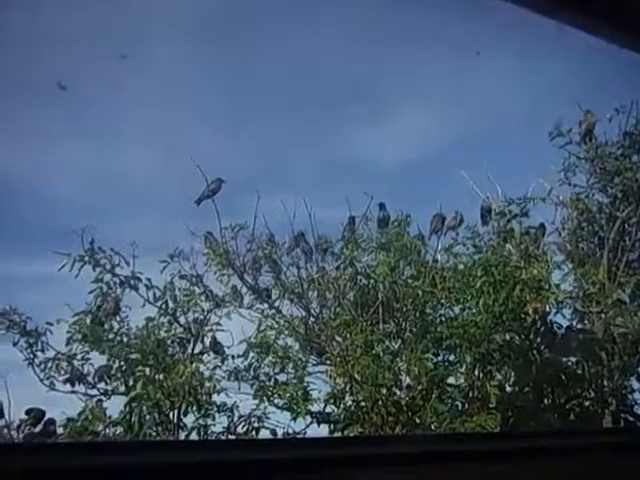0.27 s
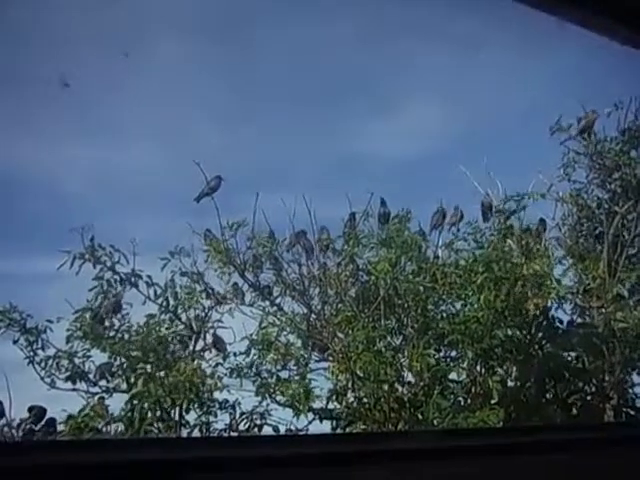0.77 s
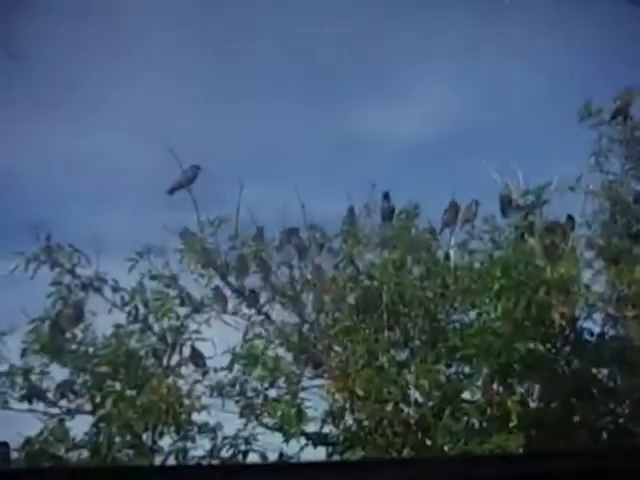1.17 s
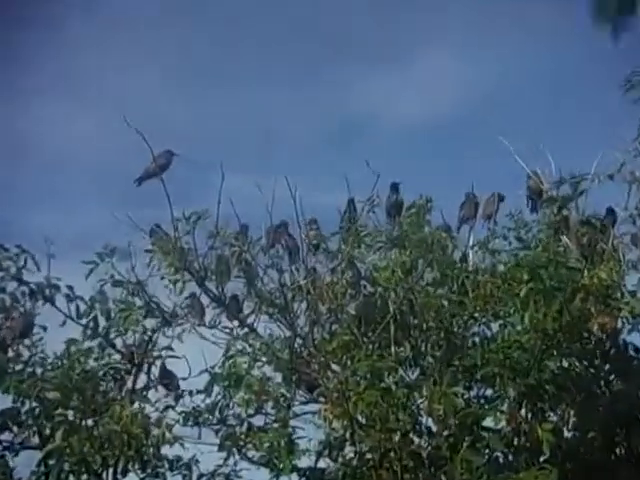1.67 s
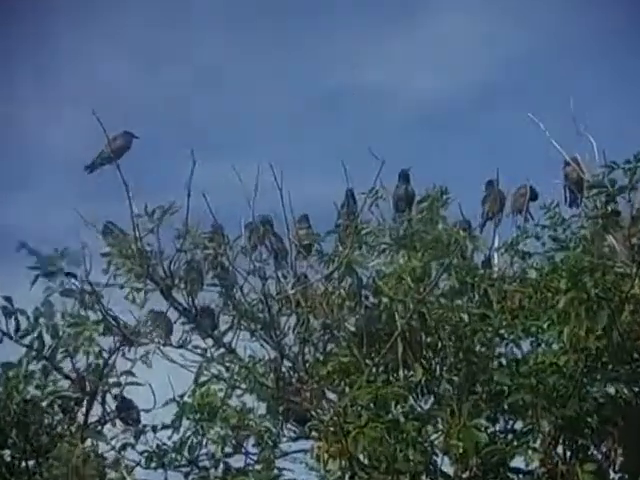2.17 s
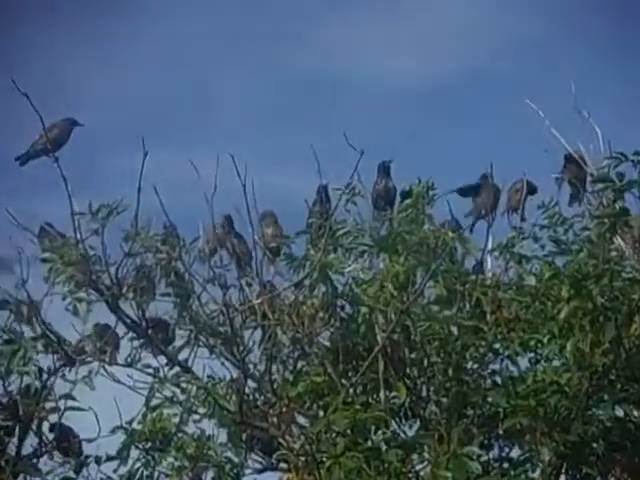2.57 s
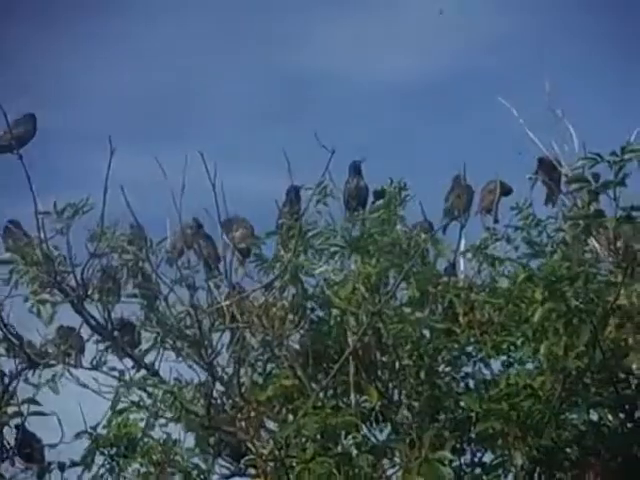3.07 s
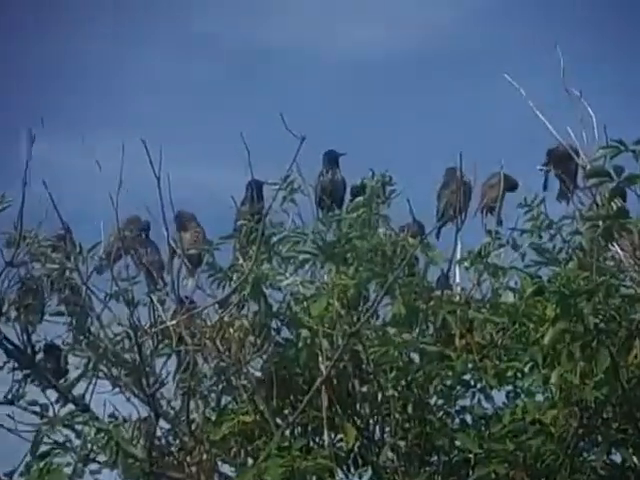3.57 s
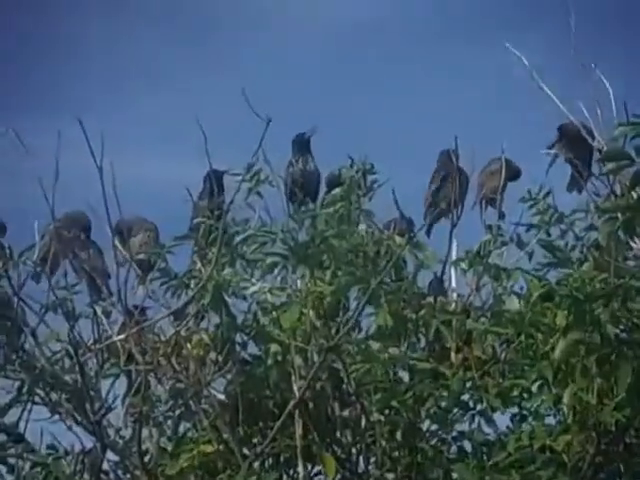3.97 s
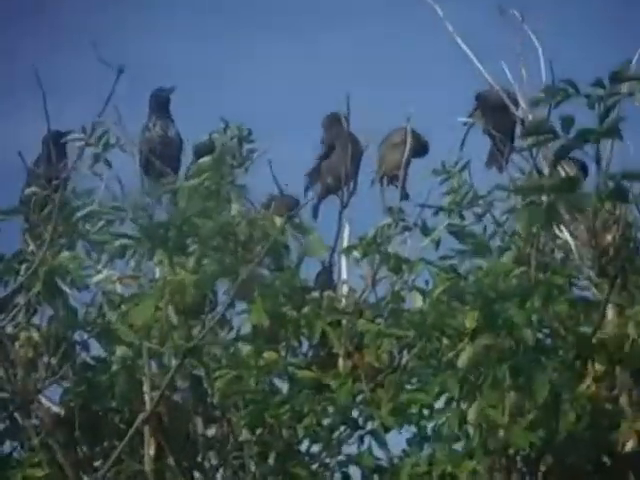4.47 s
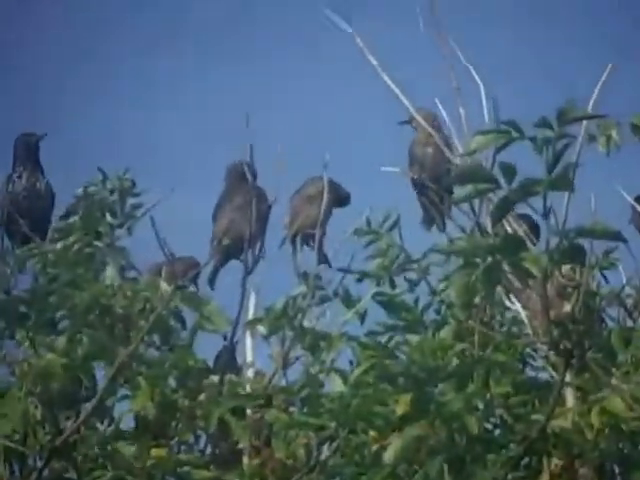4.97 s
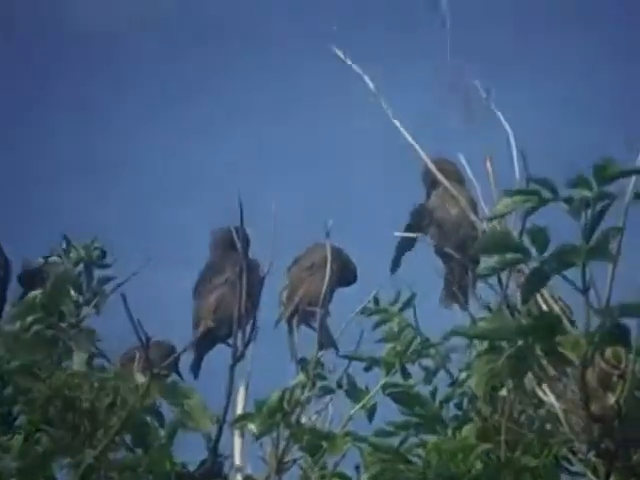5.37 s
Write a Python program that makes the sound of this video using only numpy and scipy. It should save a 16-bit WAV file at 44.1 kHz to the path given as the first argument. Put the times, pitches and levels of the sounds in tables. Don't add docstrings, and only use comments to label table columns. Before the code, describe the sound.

Dense high-pitched bird chatter with squeals and scratchy screeches outdoors, over soft hiss and hum, interrupted by loud plastic clicks near the microphone.

```python
import sys
import numpy as np
from scipy import signal
from scipy.fft import rfft, irfft
from scipy.io import wavfile

SR = 44100
rng = np.random.default_rng(int(sys.argv[2]) if len(sys.argv) > 2 else 0)


def gain_from_db(level_db):
    decades = np.asarray(level_db, float) / 20
    return 10 ** decades


def wav_record(signal):
    frames = np.transpose(np.atleast_2d(signal))
    bounded = np.clip(frames, -1, 1)
    quanta = np.round(bounded * 32767).astype(np.int16)
    wavfile.write(sys.argv[1], SR, quanta)


N = 247401

# start_s, length_s, pitch_hz, level_db
STEADY_NOTES = [(.215, .038, 8100, -41), (.235, .029, 4640, -36), (.018, .03, 9400, -43),
                (.025, .022, 7950, -39), (.243, .018, 2650, -38), (.48, .03, 5000, -39),
                (1.665, .065, 5250, -39), (1.815, .03, 6450, -38), (2.28, .013, 2660, -24),
                (2.301, .008, 2660, -24.5), (2.317, .006, 2660, -28), (2.243, .004, 2600, -31),
                (4.58, .012, 7600, -33), (1.16, .014, 5200, -33), (4.4, .03, 7120, -36),
                (2.99, .035, 8700, -29), (3.42, .02, 12000, -54), (3.71, .1, 2500, -43),
                (3.94, .006, 8100, -31), (4.05, .08, 8300, -42), (4.57, .048, 8500, -30),
                (4.6, .06, 7000, -37), (4.69, .035, 6500, -36), (.762, .036, 7900, -27),
                (.842, .014, 6100, -35), (5.015, .085, 9250, -45), (2.46, .09, 8955, -43),
                (.32, .05, 7560, -39), (.69, .11, 7880, -29), (.746, .06, 8700, -38),
                (.755, .029, 7410, -27), (.955, .099, 8780, -45), (1.016, .395, 9670, -46),
                (1.41, .94, 8930, -46), (1.645, .01, 5200, -28), (1.652, .038, 8880, -35),
                (1.99, .045, 9750, -36), (2.255, .018, 2660, -25.5), (2.432, .032, 7540, -28),
                (2.56, .041, 7130, -34), (2.577, .061, 8070, -34), (2.662, .029, 7110, -27),
                (3.386, .034, 6980, -26), (3.712, .044, 6200, -35), (3.744, .035, 7470, -28),
                (3.835, .032, 8200, -20), (3.876, .035, 8120, -19), (3.915, .012, 8080, -27),
                (4.09, .044, 6855, -35), (4.15, .07, 6550, -34), (4.22, .28, 10560, -57),
                (4.232, .058, 2610, -31), (4.52, .045, 6760, -32), (5.12, .052, 8810, -38),
                (5.09, .1, 7780, -39)]
# start_s, length_s, start_hz, end_hz, level_db
SLIDES = [(.123, .011, 8100, 7200, -23), (.088, .03, 5600, 4600, -33), (.138, .035, 11500, 10600, -49),
          (.14, .035, 5900, 5500, -38), (.34, .04, 3150, 3350, -41), (1.617, .02, 5950, 5300, -28),
          (1.595, .018, 8350, 7600, -27), (2.178, .008, 9000, 6000, -38), (2.25, .03, 4850, 5500, -34),
          (4.383, .03, 6900, 5500, -40), (1.158, .025, 1430, 1450, -40), (1.18, .04, 4450, 3900, -37),
          (1.08, .08, 8450, 9500, -41), (1.62, .025, 7250, 7750, -34), (1.47, .03, 7200, 8000, -37),
          (1.611, .003, 7600, 5600, -34), (1.85, .033, 5950, 4950, -31), (1.89, .035, 4550, 3650, -28),
          (1.95, .055, 3400, 2600, -39), (2.194, .055, 1210, 1120, -47), (2.34, .04, 4750, 4400, -33),
          (2.345, .045, 8300, 5100, -38), (2.435, .035, 7300, 8300, -30), (2.76, .06, 7500, 8650, -38),
          (2.757, .015, 3600, 3500, -32), (2.78, .07, 1300, 1200, -48), (2.87, .1, 1070, 1430, -48),
          (3.59, .04, 8400, 7650, -28), (3.66, .018, 8000, 8700, -34), (4.413, .042, 5400, 3900, -28),
          (4.452, .032, 3900, 3700, -26), (1.575, .043, 3560, 3250, -31), (4.49, .075, 3400, 2150, -42),
          (4.57, .04, 1320, 1240, -41), (4.625, .065, 1300, 1320, -39), (4.7, .13, 1350, 1490, -40),
          (4.875, .078, 1570, 1720, -40), (5.35, .022, 4200, 6500, -40), (2.715, .018, 7100, 6100, -32),
          (.95, .07, 7250, 6950, -37), (5.515, .04, 1950, 1580, -33)]
# start_s, length_s, start_hz, end_hz, level_db
SETTLING_NOTES = [(.647, .052, 6760, 6570, -33), (.882, .075, 7720, 7260, -32),
                  (1.271, .04, 7810, 7600, -34), (4.49, .075, 3300, 2250, -42),
                  (1.495, .099, 7920, 8410, -31), (1.645, .055, 7720, 7900, -26),
                  (1.705, .045, 7980, 8050, -31), (1.76, .04, 8150, 8330, -38),
                  (1.955, .04, 10400, 9900, -44), (2.128, .075, 9340, 9040, -35),
                  (2.27, .07, 7500, 8400, -34), (2.337, .113, 8790, 8450, -34),
                  (2.653, .102, 7460, 7240, -30), (2.813, .073, 7770, 7520, -38),
                  (2.818, .096, 8660, 8800, -31), (3.672, .104, 8700, 8550, -26),
                  (3.701, .038, 7130, 7300, -30), (3.733, .046, 4920, 4820, -39),
                  (4.299, .125, 7220, 7090, -35), (4.418, .09, 8120, 8490, -39),
                  (4.54, .04, 8740, 8560, -40), (4.92, .07, 7600, 7820, -41), (5.19, .084, 7760, 7660, -34),
                  (.81, .06, 9050, 9300, -45), (1.5, .03, 5400, 4950, -38), (.735, .02, 6700, 7200, -33),
                  (5.075, .03, 4100, 3600, -36), (5.475, .015, 3700, 4300, -34),
                  (2.38, .03, 5400, 4300, -36), (.865, .02, 5100, 4500, -34), (5.03, .05, 6500, 6550, -41),
                  (5.362, .025, 6600, 6700, -37), (1.07, .025, 12100, 12100, -55),
                  (1.68, .015, 12600, 12400, -56), (3.68, .055, 13100, 12700, -55),
                  (3.53, .03, 12100, 12000, -56), (5.291, .122, 8590, 8440, -39),
                  (5.474, .044, 8510, 8290, -38), (5.529, .081, 8960, 8880, -35)]
# start_s, length_s, start_hz, end_hz, level_db
BENDING_NOTES = [(.475, .038, 2110, 1780, -25.5), (.784, .096, 7900, 7720, -32),
                 (3.62, .075, 2270, 2520, -33), (1.625, .041, 1870, 1970, -40),
                 (1.965, .061, 2470, 2620, -37), (2.04, .045, 9750, 9700, -32),
                 (2.255, .052, 5520, 5350, -32), (2.293, .052, 5030, 4810, -31),
                 (2.421, .052, 1920, 2150, -39), (2.456, .049, 3800, 3400, -37),
                 (2.464, .11, 8190, 7970, -32), (2.89, .14, 8800, 8620, -29),
                 (3.035, .035, 8600, 8650, -37), (3.068, .049, 1120, 1070, -47),
                 (3.2, .14, 7800, 7600, -44), (3.52, .03, 6000, 5950, -34), (3.552, .03, 8400, 8450, -28),
                 (3.779, .055, 8330, 8500, -22), (3.825, .055, 2380, 2590, -37),
                 (4.05, .035, 5500, 5950, -37), (4.258, .052, 7260, 7550, -28),
                 (4.508, .05, 1150, 1200, -48), (4.708, .052, 7880, 7980, -35),
                 (4.748, .102, 8230, 8440, -38), (5.185, .03, 5410, 5350, -34)]
# start_s, length_s, throat_hz, level_db
RASPS = [(0.13, 0.013, 7400, -25), (0.142, 0.026, 10700, -46), (2.094, 0.038, 8900, -32.5),
         (2.66, 0.014, 9200, -41), (2.87, 0.026, 5616, -35), (3.27, 0.022, 9400, -48),
         (3.98, 0.053, 2330, -36), (3.943, 0.023, 2160, -35), (4.145, 0.05, 6400, -30),
         (4.173, 0.029, 2400, -35), (2.915, .07, 11100, -52), (4.248, .06, 12600, -56),
         (4.44, .04, 12400, -57), (4.53, .03, 11000, -51), (4.61, 0.13, 2600, -34),
         (5.216, .045, 12300, -48), (0.83, .025, 4750, -31), (1.622, .018, 11800, -51),
         (1.847, .07, 10500, -50), (5.509, 0.028, 8830, -30.5)]
# start_s, length_s, throat_hz, level_db
MORE_RASPS = [(0.59, 0.041, 4600, -26), (0.6, 0.11, 6820, -32), (0.724, 0.034, 5480, -24.5),
              (1.046, 0.046, 4610, -30), (1.305, .1, 7500, -30.5), (1.33, .07, 8000, -30),
              (1.6, .02, 6700, -34), (.61, .04, 8500, -40), (4.82, 0.027, 7400, -33), (4.4, .03, 7100, -33),
              (1.583, 0.043, 8300, -26.5), (1.674, 0.052, 7950, -28.5), (1.838, 0.03, 8300, -29),
              (1.87, 0.029, 5200, -28.5), (1.84, 0.034, 3700, -31), (2.5, 0.08, 7800, -32),
              (3.66, .025, 7500, -35), (1.96, 0.07, 10150, -40), (2.138, 0.21, 9240, -31),
              (2.097, 0.025, 4800, -29), (2.259, 0.1, 5400, -31.5), (2.288, 0.087, 8350, -27.5),
              (2.328, 0.076, 4600, -31.5), (2.77, 0.11, 9600, -37), (2.878, 0.098, 8870, -30.5),
              (3.381, 0.039, 7020, -24.5), (2.24, .1, 9700, -40), (2.5, .06, 7150, -30),
              (2.1, .025, 7800, -27), (4.1, 0.036, 3400, -31), (4.22, .05, 6800, -31),
              (4.05, .03, 5650, -30.5), (3.6, 0.029, 8100, -35), (3.71, 0.061, 7700, -24.5),
              (3.836, 0.059, 8160, -23), (4.269, 0.059, 7070, -28), (4.45, 0.03, 3900, -29),
              (4.809, 0.031, 6780, -30), (5.219, 0.048, 7700, -29.5), (5.584, .034, 8770, -31)]
# start_s, length_s, low_part_db, high_part_db
RATTLES = [(.0, 0.0078, -31, -54), (0.094, 0.038, -31, -52), (0.601, 0.037, -34, -46),
           (0.73, 0.051, -30, -57), (1.057, 0.058, -31, -54), (1.361, 0.054, -30, -51),
           (1.88, 0.044, -30, -49), (2.104, 0.031, -34, -44), (2.649, 0.084, -34.5, -62),
           (3.083, 0.015, -31, -46), (3.173, 0.031, -34, -49), (3.351, 0.049, -29, -48),
           (3.781, 0.015, -32, -39), (3.83, 0.036, -51, -43), (3.88, 0.034, -52, -45),
           (3.95, .072, -31.5, -50), (4.283, 0.044, -34, -50), (4.45, 0.03, -31.5, -47),
           (4.619, 0.029, -27.5, -57), (4.794, 0.035, -30, -49), (5.212, 0.096, -31, -58),
           (5.4, 0.017, -52, -51), (5.497, 0.028, -30.5, -45)]
# start_s, crowd_effort_db, lean_db (towards the high squealers)
FAR_CROWD = [(0, -33.5, 0.5), (.36, -42.5, -2.5), (.64, -36.5, -2.5), (.8, -34.5, 0.5), (1.14, -39.5, 1),
             (1.51, -35.5, -1.5), (2.03, -35.5, -2), (2.22, -36, -2.5), (2.86, -36.5, 2.5),
             (3.14, -38.5, -1.5), (3.61, -38, 0.5), (3.75, -41, -4), (3.94, -36, 0), (4.25, -37, -3),
             (4.61, -35, 1.5), (4.91, -38, -3.5), (5.3, -37.5, 1.5), (5.61, -41, -4)]
# frequency_hz, density_db (per Hz)
FAR_COLOUR = [(290, -10), (500, -9.5), (594, -14.5), (807, -7.5), (1010, -6), (1500, -6.5), (2020, -3),
              (2250, -3), (2570, 1), (3980, -0.5), (5260, 2), (6420, 0.5), (7640, 7.5), (9500, 1.5),
              (12000, -9.5), (15600, -36), (22000, -120)]
# frequency_hz, density_db (per Hz)
AIR_COLOUR = [(12, -35), (20, 31), (65, 31.5), (168, 20), (216, 23.5), (262, 20), (590, -7), (1190, -24),
              (2600, 15.5), (5230, -10), (7730, 1), (12100, 2.5), (16000, -7)]
# frequency_hz, density_db (per Hz)
RUMBLE_COLOUR = [(12, -29), (22, 8), (32, -1), (50, -11), (90, -30), (2000, -18), (9000, -50)]
# multiple (of the hum pitch), level_db
HUM_PARTIALS = [(2, -46), (2.5, -63), (3, -44), (4, -68.5), (4.5, -65), (5, -65.5)]
# time_s, level_db
HUM_BASE = [
    (0.0, -50),
    (1.31, -44.5),
    (5.61, -60),
]
# pitch_hz, level_db
SCAN_TONES = [(15734.2, -66), (15747.3, -70)]
PRESS_TIMES = [.2155, .2704, .388, .3967, 2.2632, 2.443, 2.7374, 2.7565, 3.1442, 3.4112, 3.8018]
# knock_db, clack_db, clack_hz, snap_db, snap_hz, tick_db
PRESSES = [(-28, -39, 1200, -32, 11000, -46), (-20, -19.5, 1100, -19.5, 11800, -34),
           (-43, -3, 3400, 6, 8200, -25), (-19, -12, 1180, -9, 6200, -22),
           (-20, -3.5, 1190, -27, 5000, -34), (-20, -19, 920, -25, 13000, -36),
           (-22, -10, 4340, 5.5, 6900, -17), (-18, -14, 1520, -7, 5800, -26),
           (-16, -15, 1160, -8.5, 4950, -16), (-13, -7.5, 1200, -5.5, 4814, -18),
           (-14.5, -20, 900, -5, 4260, -26)]


def evened(x):
    return x / np.sqrt(np.mean(abs(x) ** 2) + 1e-20)


def add(mix, s, sound):
    part = mix[max(round(s * SR), 0):][:len(sound)]
    part += sound[:len(part)]


def chance():
    a, b = rng.standard_normal((2, N + SR))
    return a + 1j * b


def flutter(strip, count, hz):
    settle = 400
    start = rng.integers(N)
    b, a = signal.butter(3, min(hz, 8000), fs=SR)
    return evened(signal.lfilter(b, a, strip[start:start + count + settle])[settle:])


def coloured(x, points):
    f, db = np.transpose(points)
    hz = np.fft.rfftfreq(N, 1 / SR)
    gain = gain_from_db(np.interp(np.log(hz + 1), np.log(f + 1), db))
    return irfft(rfft(x, N) * gain, N)


def background(strip):
    t = np.arange(N) / SR
    air = gain_from_db(-45) * evened(coloured(rng.standard_normal(N), AIR_COLOUR))
    rumble = gain_from_db(-48) * evened(coloured(rng.standard_normal(N), RUMBLE_COLOUR))
    hum_hz = 70.8
    drift = 0.0024 * flutter(strip[::-1][:N + 400].repeat(2), N, hz=0.95).real
    turns = hum_hz * t + drift
    hum = gain_from_db(np.interp(t, *np.transpose(HUM_BASE))) * np.sin(2 * np.pi * turns)
    for multiple, db in HUM_PARTIALS:
        hum += gain_from_db(db) * np.sin(2 * np.pi * (multiple * turns + rng.random()))
    scan = sum(gain_from_db(db) * np.sin(2 * np.pi * hz * t) for hz, db in SCAN_TONES)
    return air + rumble + np.sqrt(2) * (hum + scan)


def rasp(strip, length, hz, width_hz, db, rate):
    t = np.arange(round(length * 1.684 * SR)) / SR
    turns = np.cumsum(rate * (1 + 0.282 * flutter(strip, len(t), hz=61.4).real)) / SR
    puffs = np.exp(0.47 * np.cos(2 * np.pi * turns))
    ring = (np.exp(2j * np.pi * hz * t) * flutter(strip, len(t), width_hz / 2)).real
    return gain_from_db(db) * evened(ring * puffs) * signal.windows.tukey(len(t), .7)


def whistle(strip, length, start_hz, middle_hz, end_hz, db, rough):
    u = np.linspace(-1, 1, round((length + 0.0092) * SR))
    slope = (end_hz - start_hz) / 2
    bend = (end_hz + start_hz) / 2 - middle_hz
    hz = middle_hz + slope * u + bend * u ** 2
    hz *= 1 + .006 * rough * np.sin(2 * np.pi * (16 * length * u + rng.random()))
    tone = np.exp(2j * np.pi * (np.cumsum(hz) / SR + rng.random()))
    tremble = 1 + rough * flutter(strip, len(u), hz=88.0)
    fade = signal.windows.tukey(len(u), min(700 / len(u), 1))
    return gain_from_db(db) * evened((tone * tremble).real) * fade


def near_birds(strip):
    out = np.zeros(N)
    early, late, quick = .85, .2, .58
    notes = [(s, length, hz, hz, db, 0) for s, length, hz, db in STEADY_NOTES]
    notes += [(*row, early) for row in SETTLING_NOTES]
    notes += [(*row, late) for row in BENDING_NOTES]
    for s, length, hz, end_hz, db, done in notes:
        clarity = .33 if hz < 2800 else .95
        rough = np.clip(.68 + .045 * (db + 30), .1, 1) * clarity
        middle_hz = hz + done * (end_hz - hz)
        add(out, s - .004, whistle(strip, length, hz, middle_hz, end_hz, db - 1.5, rough))

    twin = 1.045
    for s, length, hz, end_hz, db in SLIDES:
        glide = np.array([hz, hz + quick * (end_hz - hz), end_hz])
        rough = .7 if hz > 3000 else .4
        add(out, s - .004, whistle(strip, length, *glide, db, rough))
        if hz > 1.3 * end_hz:
            add(out, s - .004, whistle(strip, length, *twin * glide, db - 3, rough=1))

    for s, length, hz, db in RASPS + MORE_RASPS:
        width_hz = 480 * (2.5 if hz > 10500 else 1)
        add(out, s - length / 4, rasp(strip, length, hz, width_hz, db, rate=450.0))
    for s, length, low_db, high_db in RATTLES:
        add(out, s - length / 4, rasp(strip, length, 4800, 4500, low_db, rate=134.0))
        add(out, s - length / 4, rasp(strip, length, 10400, 2000, high_db, rate=200.))
    return out


def far_voices(strip):
    voices = []
    for pitch, slide, length, kind in rng.random((600, 4)):
        hz = 1500 + 7800 * pitch
        length = .003 + .026 * length ** 2
        fall = .36 * (slide - .35)
        if kind < .75:
            db = -9 * (1 - pitch) ** 3
            voice = whistle(strip, length, hz, hz * (1 - .4 * fall), hz * (1 - fall), db, rough=.7)
        else:
            voice = rasp(strip, length, hz, 400 + hz * .15 * slide, db=-1, rate=150 + 200 * pitch)
        voices.append(voice)
    return voices


def far_birds(strip):
    voices = far_voices(strip)
    babble = np.zeros(N)
    for s, which, size in rng.random((9500, 3)):
        add(babble, s * N / SR, gain_from_db(8 * size ** 5) * voices[int(which * len(voices))])
    blur = evened(babble + 1.5 * echoes(babble)) + .5 * rng.standard_normal(N)
    flock = rfft(coloured(blur, FAR_COLOUR))

    s, effort, lean = np.transpose(FAR_CROWD)
    low_db = -29.5 + 0.18 * effort - 0.63 * lean
    levels = low_db, effort - lean, effort + lean
    octave = np.log2(np.fft.rfftfreq(N, 1 / SR) + 1)
    centres = np.log2([2300, 4800, 8000])
    t = np.arange(N) / SR
    out = np.zeros(N)
    for k, db in enumerate(levels):
        share = np.interp(octave, centres, np.eye(3)[k])
        out += gain_from_db(np.interp(t, s, db)) * evened(irfft(flock * share, N))
    return out


def echoes(x):
    t60_s, level_db = .22, -11
    t = np.arange(SR // 2) / SR
    tail = rng.standard_normal(len(t)) * gain_from_db(-60 * t / t60_s) * (t > .004)
    return gain_from_db(level_db) * signal.fftconvolve(x, tail / np.linalg.norm(tail))[:N]


def button(strip, knock_db, clack_db, clack_hz, snap_db, snap_hz, tick_db):
    t = np.arange(SR // 30) / SR

    def tone(hz):
        return np.exp(2j * np.pi * hz * t)

    knock = -np.sin(2 * np.pi * 215 * t + .8) * np.exp(-t / .0026) * (1 - np.exp(-t / .0006))
    case = np.sin(2 * np.pi * 150 * t + 1.0) * np.exp(-t / 0.011) * (1 - np.exp(-t / 0.0048))
    knock -= 0.23 * case

    clack = (tone(clack_hz) * (-1 + .3 * flutter(strip, len(t), .8 * clack_hz))).real
    clack += -.45 * tone(1900).real + .4 * tone(600).real
    clack *= np.exp(-t / .0011) * (1 - np.exp(-t / .0007))

    sag = np.exp(2j * np.pi * snap_hz * (t - 35 * t ** 2))
    snap = (sag * (.6 + .9 * flutter(strip, len(t), hz=3400))).real * np.exp(-(t / .0018) ** 1.6)
    tick = (tone(11500) * flutter(strip, len(t), hz=3000)).real * np.exp(-(t / .0013) ** 2)
    rattle = (tone(3600) * flutter(strip, len(t), hz=2600)).real
    rattle *= t / 0.0055 * np.exp(-t / 0.0038)

    rise = 1 - np.exp(-t / (.00005 + .00006 * max(-snap_db, 0)))
    bright = gain_from_db(snap_db) * (snap + .3 * rattle) + gain_from_db(tick_db) * tick
    return 2 * gain_from_db(knock_db) * knock + gain_from_db(clack_db) * clack + rise * bright


def scene():
    strip = chance()
    near = near_birds(strip)
    mix = near + echoes(near) + far_birds(strip) + background(strip)
    for s, press in zip(PRESS_TIMES, PRESSES):
        add(mix, s, button(strip, *press))
    return np.array([mix, mix])


def band_limit(x):
    return signal.sosfilt(signal.butter(12, 17140, fs=SR, output="sos"), x)


def record(dry):
    clipped = np.clip(dry, -.63, .64)
    edge = signal.firwin(401, 15950, window=("kaiser", 6), fs=SR)
    limited = signal.oaconvolve(clipped, edge[None], "same")
    return band_limit(limited)


dry = scene()
out = record(dry)
wav_record(out)
```